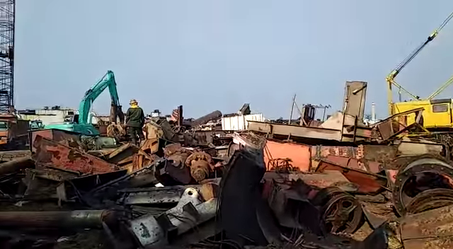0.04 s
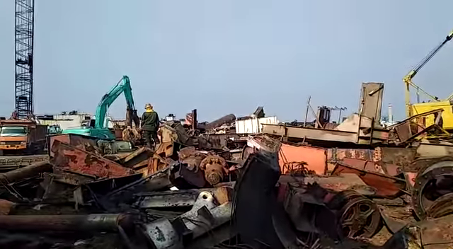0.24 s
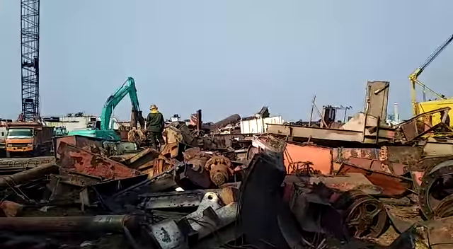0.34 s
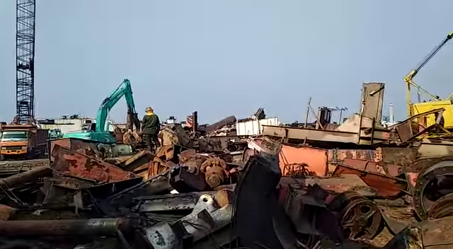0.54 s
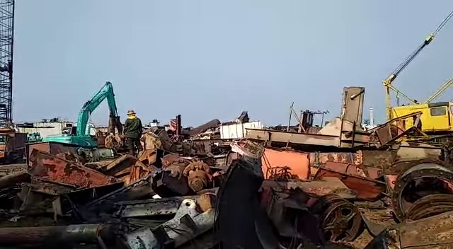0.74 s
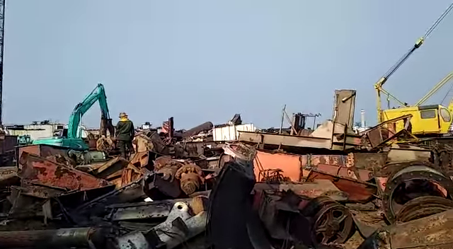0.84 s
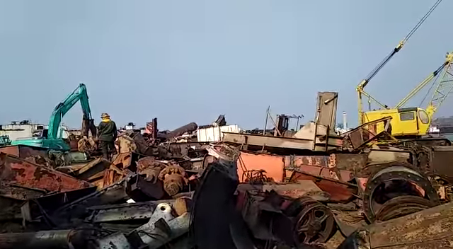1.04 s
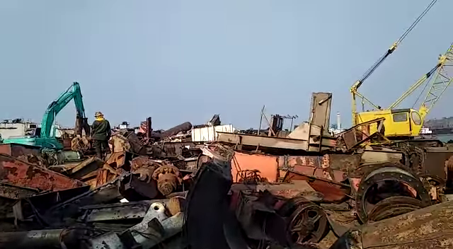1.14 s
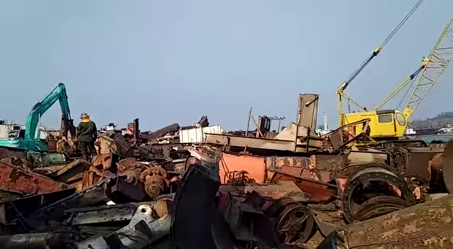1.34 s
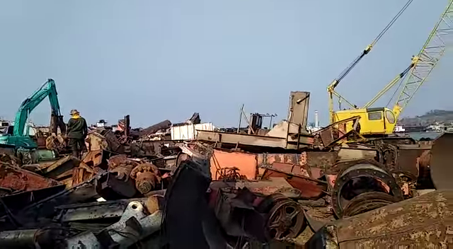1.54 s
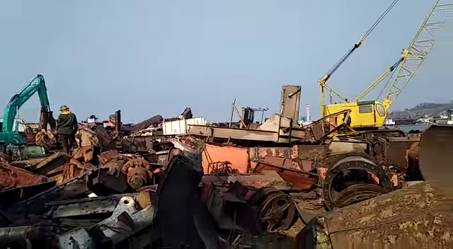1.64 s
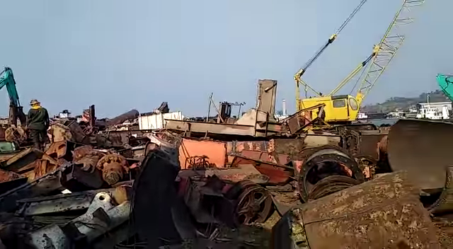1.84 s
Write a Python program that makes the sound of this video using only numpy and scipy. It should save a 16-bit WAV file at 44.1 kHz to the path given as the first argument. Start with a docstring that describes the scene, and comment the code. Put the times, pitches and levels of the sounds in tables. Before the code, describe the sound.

Heavy scrap metal crashes and clatters in an open yard, over a faint distant engine.

```python
"""An open scrap yard, heard through two microphone ports, the right one duller. Heavy steel is being
shifted: each landing rattles and sets a piece ringing. Big pieces crash, hollow ones boom, edges clack,
bars and pipes ring, a sheet scrapes and small bits clink down the heap. The heaps around throw back a
thin echo. An engine hums far off, wind nudges the ports, and the limiter flattens the loudest crashes."""
import sys
import numpy as np
from scipy import signal
from scipy.fft import rfft, irfft, next_fast_len
from scipy.io import wavfile
from scipy.ndimage import uniform_filter1d

SR = 44100
rng = np.random.default_rng(int(sys.argv[2]) if len(sys.argv) > 2 else 0)


def wav_record(signal):
    """Record a signal, one row per channel, as 16-bit PCM in the file named by sys.argv[1]."""
    frames = np.transpose(np.atleast_2d(signal))
    bounded = np.clip(frames, -1, 1)
    # unit amplitude maps onto the largest positive 16-bit level
    quanta = np.round(bounded * 32767).astype(np.int16)
    wavfile.write(sys.argv[1], SR, quanta)


N = 83790
T = np.arange(N) / SR
RING_T = np.arange(SR // 2) / SR
PORT_LEAD_S = 0.0003075  # sound reaches the left port first
PORT_T = RING_T - [[0], [PORT_LEAD_S]]

# far engine's orders: f/Hz, starting level/dB, swell/(dB/s)
ENGINE_ORDERS = [(53.6, -46, 0.5), (167.3, -39, -1.5), (255.4, -47.5, 2.5)]
# wind buffets at the right port: t/s, level/dB, half length/s
GUSTS = [(0.606, -19.5, 0.028), (0.892, -25.5, 0.027), (1.086, -28, 0.012), (1.243, -29, 0.046),
         (1.396, -19, 0.0074), (1.457, -26, 0.03), (1.64, -21, 0.02), (1.76, -45, 0.015)]
# small bits: t/s, level/dB, rattle/s, t60/s, left minus right/dB, sparkle above 12 kHz/dB
CLINKS = [(0.229, -18, 0.0017, 0.08, -1, 0.5), (0.243, -19, 0.12, 0.83, -7, -9),
          (0.269, -12.5, 0.0043, 0.21, -2, 4), (0.297, -11.5, 0.036, 0.23, -4, 0.5),
          (0.391, -20, 0.0022, 0.26, -3, -18), (0.43, -6.5, 0.013, 0.17, -3.5, -2.5),
          (0.475, -18, 0.14, 0.33, -5.5, 1), (0.574, -9.5, 0.0025, 0.079, -2.5, -14),
          (0.596, -23.5, 0.049, 1, -9.5, -21), (0.734, -16, 0.022, 0.33, -2.5, -2),
          (0.778, -18, 0.082, 1, -0.5, -1), (0.832, -9.5, 0.018, 0.28, -4, -0.5),
          (0.86, -17, 0.074, 0.55, -4, -9), (0.974, -16, 0.02, 0.38, -3.5, -28),
          (1.046, -32, 0.055, 0.86, 8.5, -24), (1.276, -28, 0.014, 0.7, -3, -14),
          (1.294, -18, 0.024, 1, -3, -19), (1.431, -22, 0.073, 0.18, -6.5, -26),
          (1.508, -28.5, 0.012, 0.24, 14, -23), (1.572, -22, 0.0039, 0.7, -3, 1.5),
          (1.615, -15.5, 0.016, 0.21, -2.5, 0), (1.737, -20, 0.013, 0.21, -1.5, -0.5),
          (1.789, -26, 0.052, 0.23, -1, 0.5)]
# bars and pipes ringing on one note: t/s, f/Hz, level/dB, t60/s
BAR_NOTES = [(.01, 504, -34.5, 0.7), (0.207, 1185, -27.5, 0.75), (.275, 11650, -19, 0.27),
             (.275, 6530, -8.5, 0.12), (0.282, 993, -12, 0.18), (.394, 7950, -14, 0.082),
             (0.586, 373.5, -17, 0.1), (0.599, 1475, -18, 0.25), (.612, 2087, -13, 0.22),
             (.738, 9170, -15, 0.21), (.99, 1341, -16.5, 0.41), (0.997, 7200, -22.5, 0.55),
             (1.095, 7060, -20.5, 0.24), (1.291, 7060, -20.5, 0.18), (1.383, 265, -14.5, 0.083),
             (1.42, 1920, -15, 0.15), (1.52, 801, -24.5, 0.19), (1.578, 7640, -16.5, 0.055),
             (1.617, 7650, -15.5, 0.16), (1.621, 7900, -14.5, 0.13), (1.774, 7250, -20.5, 0.077),
             (1.829, 904, -29, 0.079)]
# edges knocking together: t/s, level/dB, f/Hz
CLACKS = [(0.717, -13, 1720), (0.749, -13, 1620), (0.945, -11.5, 1220), (0.969, -23, 1870),
          (1.156, -29, 1090), (1.280, -30, 1850), (1.309, -12, 1240), (1.354, -11, 1210),
          (1.741, -25, 1140)]
# hollow pieces: t/s, level/dB, rattle/s
BOOMS = [(.0, -33, 0.019), (0.279, -23, 0.028), (0.319, -15.5, 0.051), (.585, -27.5, 0.034),
         (0.74, -28.5, 0.091), (0.874, -20, 0.061), (0.976, -23.5, .04), (1.304, -28, 0.048),
         (1.387, -32.5, 0.061), (1.455, -31, 0.073)]
# big pieces landing: t/s, level/dB, rattle/s, t60/s, bite of the edges/dB, pitch factor
CRASHES = [(0.191, -35.5, 0.021, 0.27, -20, 1.05), (0.223, -26, 0.068, 0.43, -7.5, 0.83),
           (0.274, -3.5, 0.045, 0.2, -12.5, 1.094), (0.306, -9.5, 0.059, 0.14, -9.5, 1.03),
           (0.427, -10, 0.031, 0.16, 3, 1.16), (0.521, -28, 0.14, 1, -24, 1.07),
           (0.584, -18, 0.053, 0.073, -11, 1.21), (0.711, -12.5, 0.029, 0.31, -16, 0.96),
           (0.783, -17, 0.09, 0.51, -8, 1.015), (0.856, -11, 0.067, 0.36, -11.5, 0.99),
           (0.982, -14, 0.061, 0.18, -15, 1.017), (1.152, -29, 0.013, 0.17, -42, 1.07),
           (1.229, -31, 0.057, 0.28, -15, 0.97), (1.276, -13.5, 0.026, 0.26, -34.5, 0.96),
           (1.293, -16.5, 0.0409, 0.64, -18, 1.02), (1.418, -14.5, 0.04, 0.12, -20, 1.06),
           (1.452, -21, 0.025, 0.16, -5.5, 1.31), (1.524, -30, 0.042, 0.58, -38, 0.78),
           (1.612, -29.5, 0.04, 0.21, -9, 0.95), (1.735, -28, 0.013, 0.35, -5.5, 0.92),
           (1.824, -35, 0.0062, 0.072, -15, 0.76)]
# big steel's modes at pitch factor 1: f/Hz, relative level/dB, longest t60/s
STEEL_MODES = [(498.4, -4, 0.16), (694, -4, 0.28), (918, 11, 0.17), (1055, 6, 0.18), (1195, -2, 0.55),
               (1346, 1, 0.31), (1411, 6.5, 0.066), (1914, -4, 0.21), (1942, 18, 0.052), (2384, -4, 1)]
# spectra of the sources: f/Hz, relative level/dB
RUMBLE_TONE = [(20, -20), (50, 2), (110, 5.5), (220, -2), (400, -8.5), (900, -20.5), (2000, -20),
               (5000, -26.5), (10000, -15), (15500, -23.5)]
WIND_TONE = [(15, 19.5), (35, -80.5), (55, 15.5), (75, -4), (120, -11), (250, -38)]
GRIT_TONE = [(1200, -22), (2900, 5), (6000, 1.5), (14000, -2)]
CLINK_TONE = [(200, -74), (1500, 1), (3000, -4), (4000, -6), (5200, -18.5), (6600, 6.5), (8000, 7.5),
              (11300, 10), (12800, 8.5), (15500, -1.5)]
BOOM_TONE = [(50, -68), (110, -40), (200, -18.5), (270, -8), (370, -2), (520, -1.5), (750, -3),
             (1300, -28.5)]
BITE_TONE = [(200, -68), (1200, -31), (2600, 2), (3500, -4.5), (4400, 6.5), (5800, 1.5), (7000, -10),
             (10000, -12)]
CRASH_TONE = [(60, -73), (150, -19), (400, -33.5), (650, -9), (1000, 2.5), (1600, -4.5), (2050, 0.5),
              (2650, -9), (3400, -17.5), (5000, -22), (9000, -27.5)]  # at pitch factor 1
# response of the duller right port: f/Hz, gain/dB
RIGHT_PORT_TONE = [(100, 2), (6000, -0.5), (10500, -8), (13000, -27), (16000, 0)]


def amp(db):
    """Decibels to gain."""
    return 10 ** (np.asarray(db) / 20)


def unit(x):
    """Scales to rms 1."""
    return x / np.sqrt(np.mean(x ** 2) + 1e-20)


def add(mix, s, sound):
    """Mixes a stereo sound in at time s."""
    part = mix[:, max(round(s * SR), 0):][:, :sound.shape[1]]
    part += sound[:, :part.shape[1]]


def colour(x, tone):
    """Minimum-phase filter with the given spectrum."""
    hz, db = np.transpose(tone)
    f = abs(np.fft.fftfreq(4096, 1 / SR))
    log_gain = np.log(amp(np.interp(np.log(f + 1), np.log(hz), db)))
    taps = np.fft.ifft(np.exp(np.conj(signal.hilbert(log_gain)))).real[:len(f) // 2]
    n = next_fast_len(x.shape[-1] + len(taps), True)
    return irfft(rfft(x, n) * rfft(taps, n), n)[..., :x.shape[-1]]


def plate(t60, spacing_hz, scatter_rad, count=3, rasp_db=-9.5):
    """A few irregular pieces ring at both ports: crowded random modes and a shorter rasp."""
    n = len(RING_T)
    f = np.fft.rfftfreq(n, 1 / SR)
    left, right, skew = rng.standard_normal((3, count, len(f)))
    is_mode = rng.random(left.shape) < f[1] / spacing_hz
    modes = is_mode * np.exp(2j * np.pi * rng.random(left.shape))
    lag = np.exp(1j * (scatter_rad * skew - 2 * np.pi * f * PORT_LEAD_S))
    ports = np.stack([modes * amp(2 * left), modes * amp(2 * right) * lag], axis=1)
    rasp = rng.standard_normal((count, 2, n)) * amp(rasp_db - 60 * RING_T / (0.64 * t60))
    return unit(irfft(ports, n)) * amp(-60 * RING_T / t60) + rasp


def strike(rings, db, rattle_s, first_hit, contacts_per_s=520, spread_db=3):
    """A first contact, sized against the smallest, and a rattle of others set the pieces ringing."""
    shape = (len(rings), 1, len(RING_T))
    size = amp(spread_db * np.minimum(rng.exponential(1, shape), 3))
    hits = (rng.random(shape) < contacts_per_s / len(rings) / SR) * rng.choice([-1, 1], shape) * size
    hits[0, 0, 0] = first_hit
    hits = hits[..., :max(int(rattle_s * SR), 2)]
    sound = signal.fftconvolve(rings, hits, axes=2).sum(0)[:, :len(RING_T)]
    attack = sound[:, :int((rattle_s + 0.0055) * SR)]
    return amp(db) * sound / np.sqrt(np.mean(attack ** 2))


def engine(rumble_db=-36.5, waver_hz=2.15):
    """Far off, an engine's low orders waver in a broad rumble."""
    noise = rng.standard_normal((3, N))
    out = amp(rumble_db) * unit(colour(noise[:2] + 0.92 * noise[2], RUMBLE_TONE))
    for hz, db, swell in ENGINE_ORDERS:
        waver = np.interp(T, np.linspace(0, T[-1], 24), rng.standard_normal(24))
        out += amp(db + swell * T) * unit(np.sin(2 * np.pi * np.cumsum(hz + waver_hz * waver) / SR))
    return out


def wind():
    """Wind on the microphone: low flutter and short buffets, mostly at the right port."""
    noise = rng.standard_normal((3, N))
    flutter = unit(colour(noise[:2] + noise[2], WIND_TONE))
    out = amp(-37.5) * flutter
    for s, db, half_s in GUSTS:
        puff = np.exp(-((T - s) / half_s) ** 2)
        out += amp(db) * flutter * puff * np.linalg.norm(puff) / np.linalg.norm(flutter[1] * puff)
    low_cut = signal.butter(3, 36, "high", fs=SR, output="sos")
    return signal.sosfiltfilt(low_cut, out) * amp([[-10], [0]])


def yard_echo(x, db=-11, t60=0.52, delay_s=0.018, echoes_per_s=1500):
    """The surrounding heaps scatter a thin tail back to the microphone."""
    shape = (2, len(RING_T))
    taps = rng.standard_normal(shape) * (rng.random(shape) < echoes_per_s / SR)
    fade = amp(-60 * RING_T / t60) * (RING_T > delay_s)
    tail = colour(taps * fade, [(200, 1), (1500, -2.5), (5000, -3), (10000, -18), (14000, -1)])
    return amp(db) * signal.fftconvolve(x, tail / np.linalg.norm(tail[0]), axes=1)[:, :N]


def scrape(start_s=0.76, length_s=0.29, db=-24, slips_per_s=190, spread_db=12):
    """A sheet dragged over the heap catches and slips; each slip rings a few high modes."""
    out = np.zeros((2, N))
    rings = colour(plate(t60=0.042, spacing_hz=322, scatter_rad=1), GRIT_TONE)
    shape = (len(rings), 1, int(length_s * SR))
    slips = rng.random(shape) < slips_per_s / len(rings) / SR
    size = amp(spread_db * np.minimum(rng.exponential(1, shape), 2))
    grit = signal.fftconvolve(rings, slips * size, axes=2).sum(0)[:, :shape[-1]]
    add(out, start_s, amp(db) * unit(grit) * np.sin(np.linspace(0, np.pi, shape[-1])))
    return out


def clinks():
    """Small bits skitter down the heap on sparse, bright modes, mostly right of the microphone."""
    out = np.zeros((2, N))
    for s, db, rattle_s, t60, pan_db, sparkle_db in CLINKS:
        tone = [(hz, level + sparkle_db * (hz > 12000)) for hz, level in CLINK_TONE]
        rings = colour(plate(t60, spacing_hz=114.8, scatter_rad=2.53), tone)
        add(out, s, strike(rings, db, rattle_s, first_hit=7) * amp([[pan_db / 2], [-pan_db / 2]]))
    return out


def bars(spread=0.024, build_cycles=3.4):
    """Bars and pipes ring on a tight, beating cluster of modes; the high ones lie to the left."""
    out = np.zeros((2, N))
    for s, hz, db, t60 in BAR_NOTES:
        offsets = (np.arange(6) + rng.random(6)) / 3 - 1
        mode_hz = hz * (1 + spread * offsets[:, None, None])
        cycles = mode_hz * PORT_T + rng.random(mode_hz.shape) + 0.23 * rng.standard_normal((6, 2, 1))
        fade = np.minimum(RING_T * hz / build_cycles, 1) * amp(-60 * RING_T / t60)
        ring = unit(np.sin(2 * np.pi * cycles).sum(0) * fade) * np.sqrt(np.mean(fade ** 2))
        add(out, s, amp(db) * ring * amp([[0], [-6 * min(hz / 7000, 1)]]))
    return out


def clacks(skirt_db=-16.5):
    """Edges knock hard together: a broad, quickly damped ring around each pitch."""
    out = np.zeros((2, N))
    for s, db, hz in CLACKS:
        tone = [(hz * 2. ** octave, skirt_db * octave ** 2) for octave in range(-2, 3)]
        rings = colour(plate(t60=0.066, spacing_hz=32, scatter_rad=0.93), tone)
        add(out, s, strike(rings, db, rattle_s=0.003, first_hit=7))
    return out


def booms():
    """Hollow pieces answer low and briefly, just right of centre."""
    out = np.zeros((2, N))
    for s, db, rattle_s in BOOMS:
        rings = colour(plate(t60=0.083, spacing_hz=8.2, scatter_rad=0.99), BOOM_TONE)
        add(out, s, strike(rings, db, rattle_s, first_hit=3.8))
    return out * amp([[-1], [1]])


def clang(t60, pitch, detune=0.0065):
    """Big steel rings on a few strong modes; no two pieces are tuned quite alike."""
    count = len(STEEL_MODES)
    phases = 2 * np.pi * rng.random((count, 1)) + 2.62 * rng.standard_normal((count, 2))
    tunings = pitch + detune * rng.standard_normal(count)
    ring = np.zeros_like(PORT_T)
    for (hz, db, mode_t60), phase, tuning in zip(STEEL_MODES, phases, tunings):
        fade = amp(db - 60 * RING_T / min(mode_t60, t60))
        ring += fade * np.sin(2 * np.pi * hz * tuning * PORT_T + phase[:, None])
    return unit(ring)


def crashes(clang_db=-5, build_s=0.002):
    """Big pieces tumble: the edges bite at once, while the clang and crowded body modes build up."""
    out = np.zeros((2, N))
    build = 1 - np.exp(-RING_T / build_s)
    for s, db, rattle_s, t60, bite_db, pitch in CRASHES:
        steel = amp(clang_db) * clang(t60, pitch)
        tone = [(hz * pitch, level) for hz, level in CRASH_TONE]
        body = unit(colour(plate(t60, spacing_hz=12, scatter_rad=0.94), tone))
        edges = unit(colour(plate(0.48 * t60, spacing_hz=213, scatter_rad=1.07), BITE_TONE))
        rings = build * (body + steel) + amp(bite_db) * edges
        add(out, s, strike(rings, db, rattle_s, first_hit=2.45))
    return out


def scene():
    """At the microphone: falling scrap and its echo, ringing bars, the far engine and wind."""
    scrap = crashes() + clacks() + scrape() + booms() + clinks()
    return scrap + yard_echo(scrap) + bars() + engine() + wind()


def record(dry, limit_db=-5, release_db_per_s=25, cutoff_hz=15750):
    """The right port dulls the sound; the limiter ducks everything under the big crashes."""
    x = np.vstack([dry[:1], colour(dry[1:], RIGHT_PORT_TONE)])
    level_db = 10 * np.log10(abs(uniform_filter1d((x ** 2).mean(0), size=220)) + 1e-12)
    release = T * release_db_per_s
    held_db = np.maximum.accumulate(level_db + release) - release
    over_db = np.maximum(held_db - limit_db, 0)
    x = x / amp(uniform_filter1d(over_db, size=90))
    x = x / (1 + x ** 6) ** (1 / 6)  # soft overload
    low_pass = signal.firwin(511, cutoff_hz, window=("kaiser", 8), fs=SR)
    return signal.oaconvolve(x, low_pass[None], "same")


dry = scene()
out = record(dry)
wav_record(out)
```